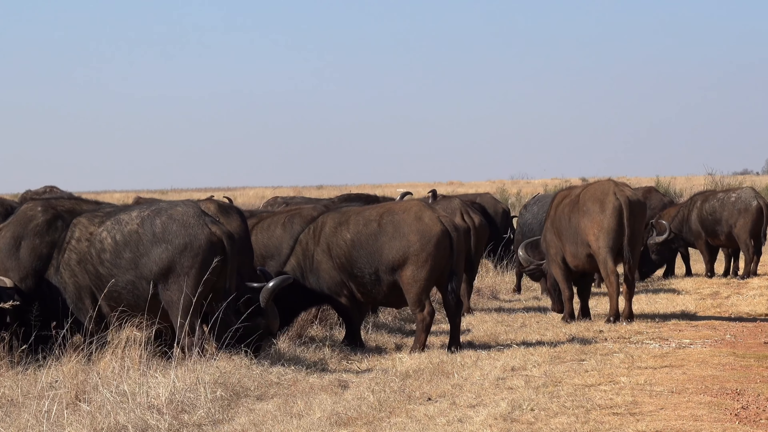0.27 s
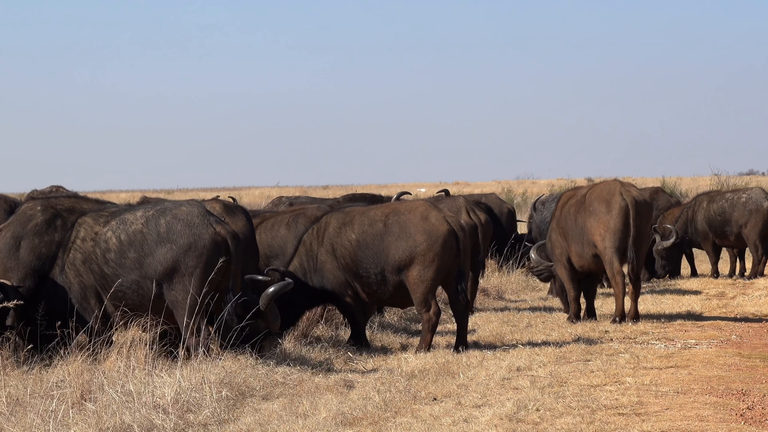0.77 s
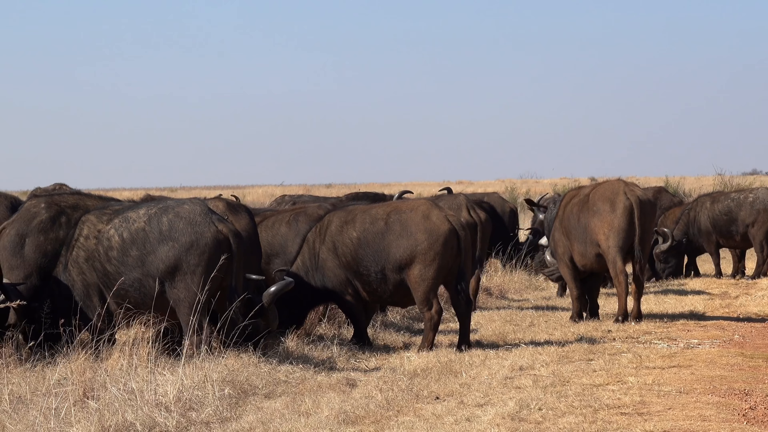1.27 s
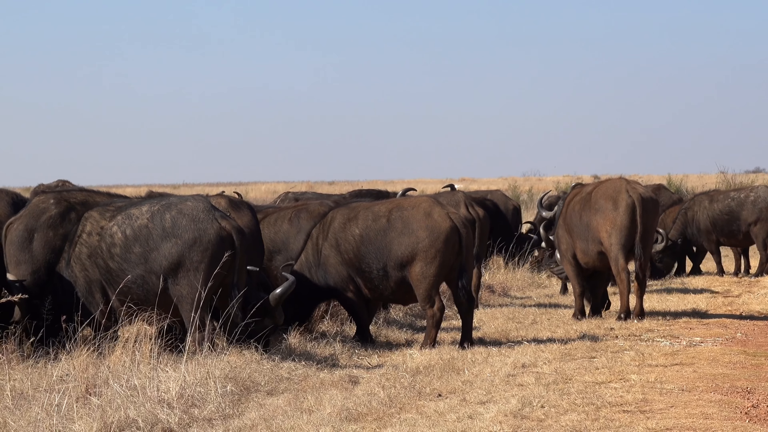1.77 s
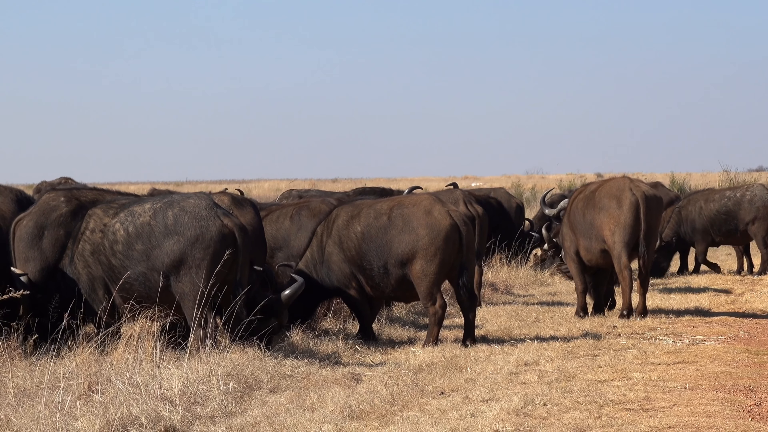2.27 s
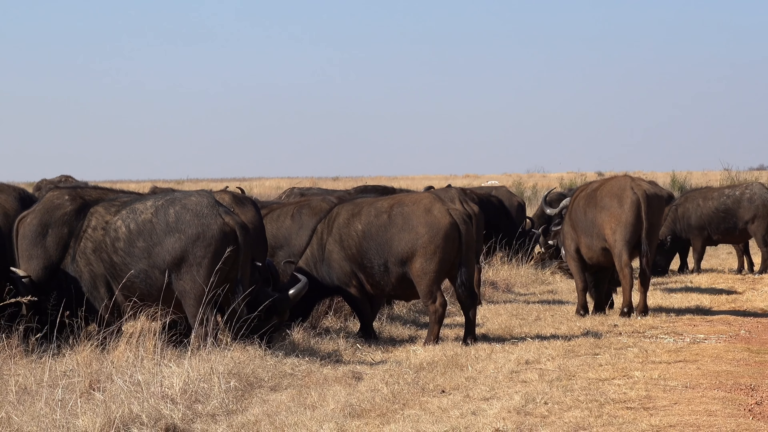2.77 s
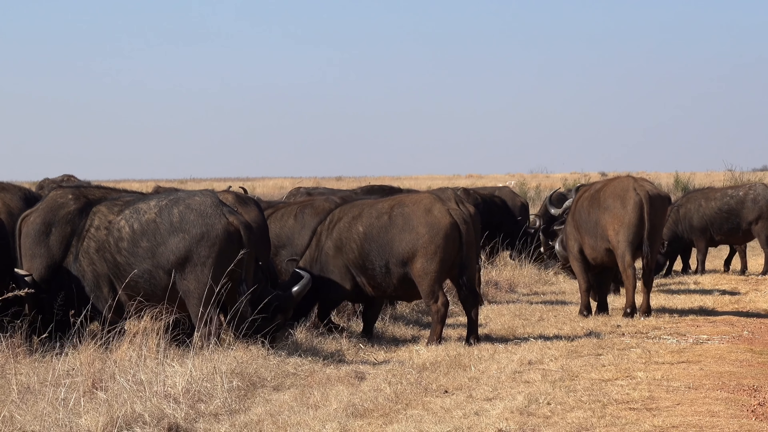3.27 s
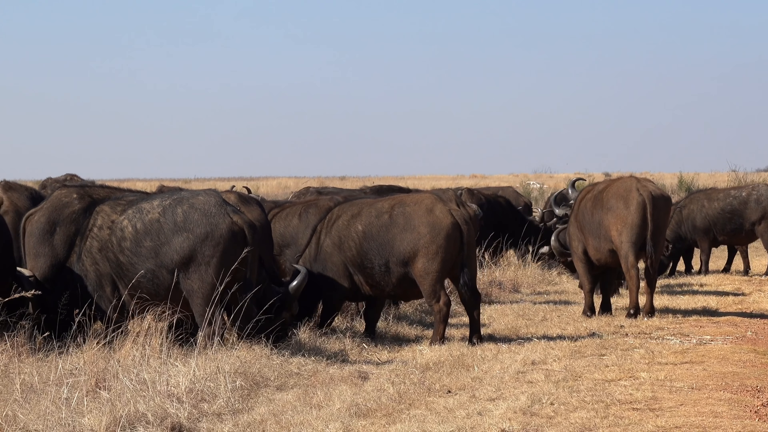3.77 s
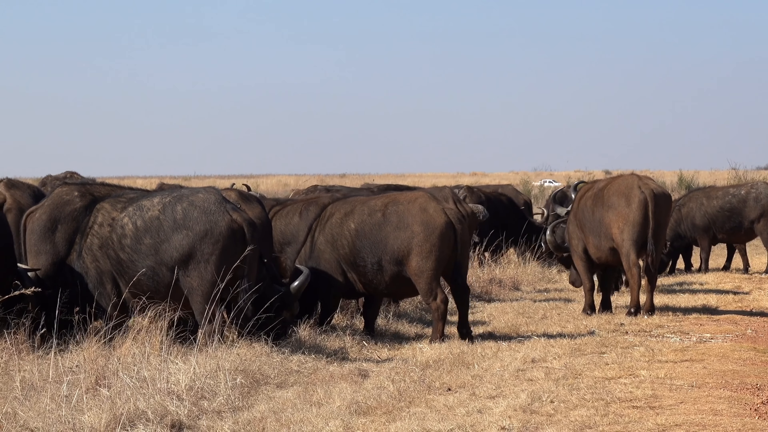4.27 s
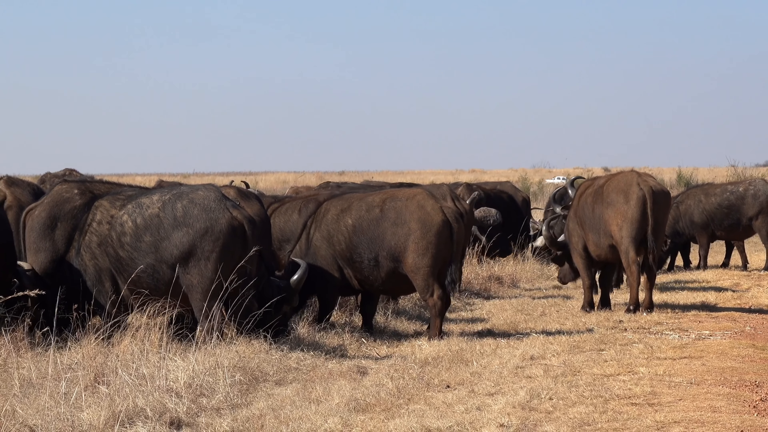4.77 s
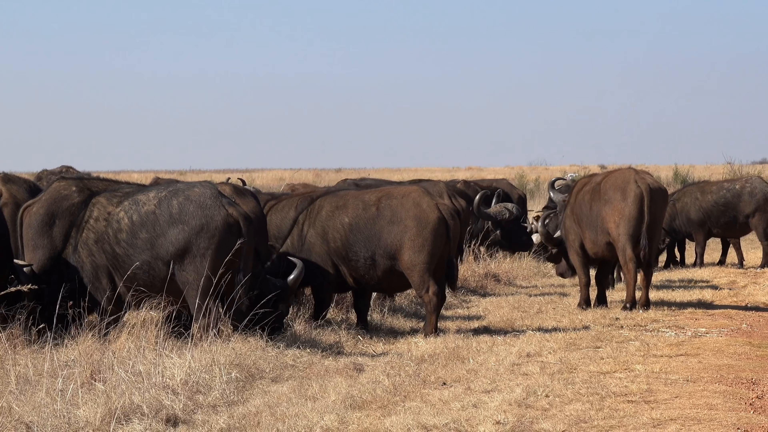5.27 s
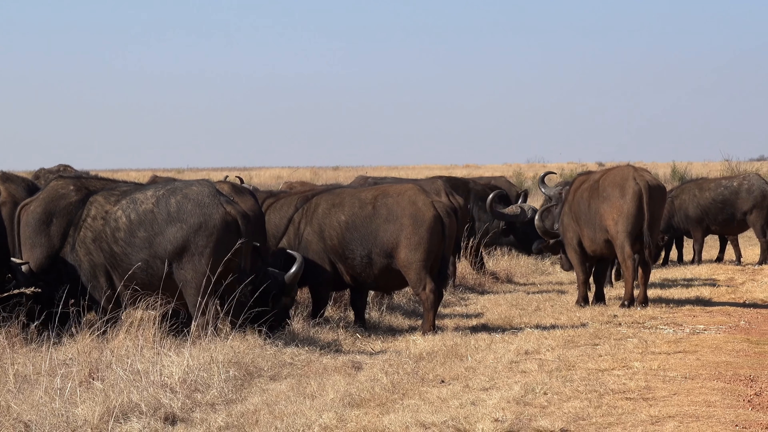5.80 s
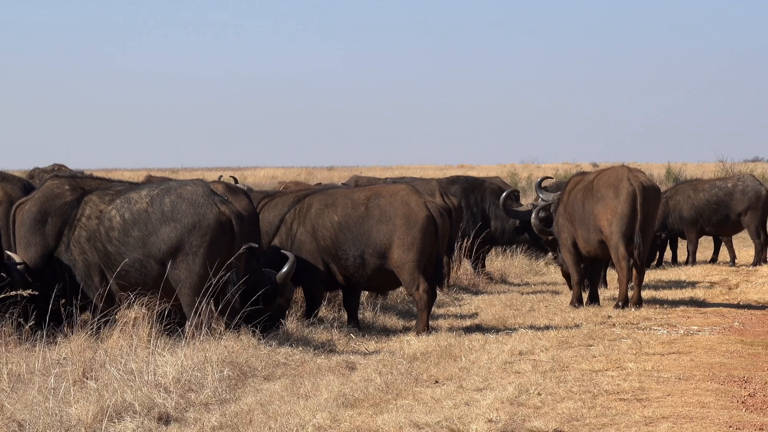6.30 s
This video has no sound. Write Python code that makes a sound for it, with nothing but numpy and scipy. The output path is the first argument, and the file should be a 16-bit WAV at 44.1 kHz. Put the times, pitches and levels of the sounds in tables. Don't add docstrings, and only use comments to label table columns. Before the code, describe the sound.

A buffalo close by finishes a call, gives a rattling grunt and a long distorted bellow, then grunts and bellows again more briefly.

```python
import sys
import numpy as np
from scipy import signal
from scipy.io import wavfile
from scipy.ndimage import uniform_filter1d

SR = 44100
rng = np.random.default_rng(int(sys.argv[2]) if len(sys.argv) > 2 else 0)


def boost_factor(decibels):
    exponent = np.asarray(decibels, float) / 20
    return 10 ** exponent


def waveform_to_disk(signal):
    frames = np.transpose(np.atleast_2d(signal))
    scaled = np.clip(frames, -1, 1) * 32767
    samples = np.round(scaled).astype(np.int16)
    wavfile.write(sys.argv[1], SR, samples)


N = 288414


def evened(x):
    return x / np.sqrt(np.mean(x ** 2) + 1e-20)


def steadied(x, seconds):
    width = int(seconds * SR)
    power = uniform_filter1d(uniform_filter1d(x ** 2, width), width)
    return x / np.sqrt(abs(power) + 1e-20)


def read(points, hz):
    f, value = np.transpose(points)
    return np.interp(np.log(hz + 1), np.log(f + 1), value)


def follow(table, t):
    when, *columns = np.transpose(table)
    return [np.interp(t, when, column) for column in columns]


def add(mix, s, sound):
    part = mix[round(s * SR):][:len(sound)]
    part += sound[:len(part)]


def resonate(x, hz, width_hz):
    turn = np.exp(2j * np.pi * np.cumsum(hz * np.ones(len(x))) / SR)
    r = np.exp(-np.pi * width_hz / SR)
    return 2 * (turn * signal.lfilter([1 - r], [1, -r], x / turn + 1e-18)).real


def ring(x, hz, width_hz, skirt_hz):
    return resonate(resonate(resonate(x, hz, width_hz), hz, skirt_hz), hz, skirt_hz)


# pitch_hz, level_db (per Hz)
AIR_COLOUR = [(15, -39.5), (25, -16), (110, -1.5), (210, -7.5), (400, -4), (520, -4.5), (750, -4),
              (1020, -4.5), (1520, -12), (2350, -17), (5000, -27.5), (9300, -34.5), (13000, -35),
              (16000, -50.5)]


def air():
    frames, hz = N // 256 + 5, np.fft.rfftfreq(1024, 1 / SR)
    a, b, patches = rng.standard_normal((frames, 513, 3)).T
    patches = evened(uniform_filter1d(uniform_filter1d(patches, 14, 0), 20, 1))
    swell = evened(uniform_filter1d(rng.standard_normal(frames), 30))
    z = (a + 1j * b) * boost_factor(read(AIR_COLOUR, hz)[:, None] + 1.5 * patches + 0.6 * swell)
    hiss = signal.istft(z, nperseg=1024, noverlap=768)[1][:N]
    insect_hz, insect_width_hz = 12900, 250
    insect = resonate(rng.standard_normal(N), insect_hz, insect_width_hz)
    insect = resonate(insect, insect_hz, insect_width_hz)
    return boost_factor(-70.5) * evened(hiss) + boost_factor(-96) * evened(insect)


# start_s, level_db,
# length_s, # centre_hz
RUSTLES = [(.5, -57.5, 0.23, 45), (0.71, -64.5, 0.12, 170), (2.081, -51.5, 0.59, 34.38),
           (2.484, -48.5, .45, 36.6), (2.997, -39, 0.067, 49), (3.102, -53.5, 0.13, 45),
           (6.0, -55, 0.45, 35.1), (1.0707, -71.5, 0.027, 3000), (3.455, -78, 0.6, 3100),
           (3.816, -53, 0.031, 705), (3.823, -62.5, 0.043, 240), (3.83, -66.5, 0.038, 3390),
           (3.912, -66.5, 0.03, 2490), (4.092, -67.5, 0.16, 4020), (4.194, -75.5, 0.23, 3070),
           (4.524, -76, 0.03, 3970), (4.552, -64.5, 0.00445, 2500), (4.559, -57, 0.0061, 1400),
           (4.5598, -72, 0.066, 886), (4.85, -71.5, 0.25, 71), (5.57, -41.5, 0.0079, 748),
           (6.493, -50.5, .07, 453), (3.18, -54, .1, 300), (0.62, -70.5, 0.029, 2100),
           (.451, -50, 0.0042, 4000)]


def rustling():
    out = np.zeros(N)
    for (s, db, length, hz), snaps in zip(RUSTLES, rng.standard_normal((len(RUSTLES), SR // 2))):
        spiky = snaps * abs(snaps)
        clump = evened(resonate(resonate(spiky, hz, 2.2 * hz), hz, 1.2 * hz))[:int(length * SR)]
        add(out, s, boost_factor(db) * clump * signal.windows.hann(len(clump)) ** 0.75)
    return out


# start_s, peak_db
KNOCKS = [
    (4.0943, -25),
    (4.0959, -25),
    (4.0986, -18.5),
    (4.0999, -31),
]
# pitch_hz, level_db, fade_s (time to fall 60 dB)
HORN_TONES = [(150, -14, .03), (330, -5, .02), (560, -4, .02), (770, -5, .012), (1300, 3, .012),
              (1540, -4, .01), (2200, -9, .008), (2950, -7, .008), (7300, -16, .004)]


def horns():
    out, t = np.zeros(N), np.arange(2000) / SR
    tones = -sum(boost_factor(db - 60 * t / fade) * np.cos(2 * np.pi * hz * t) for hz, db, fade in HORN_TONES)
    tones = np.convolve(tones, np.hanning(7))
    for s, db in KNOCKS:
        add(out, s, boost_factor(db) * tones / abs(tones).max())
    return out


# pitch_hz, fade_s (time to fall 60 dB)
ECHO_FADE = [(200, 0.093), (1500, 0.21), (5000, 0.057), (14000, 0.028)]


def scattered(x):
    taps = np.zeros(SR // 2)
    at = np.arange(400, SR // 2 - 20, 20)
    taps[at + rng.integers(0, 20, len(at))] = rng.choice([-1., 1.], len(at))
    hz, t, z = signal.stft(taps, SR, nperseg=256)
    fade = boost_factor(-60 * t / read(ECHO_FADE, hz)[:, None])
    tail = signal.istft(z * fade, SR, nperseg=256)[1]
    return signal.fftconvolve(x, tail / np.linalg.norm(tail))[:N]


# time_s, effort_db, fold_pulses_hz, chest_hz, mouth_opening_0to1
CALL_END = [
    ((.3, .62, .02, -3, -12), [(.259, -27, 94, 160, .2), (.28, -28.5, 92, 158, .3), (.34, -29, 86, 170, .35), (.42, -24, 79, 166, .45), (.465, -23, 74, 179, .3)]),
    ((.5, .75, .2, 6, -10), [(.5, -32, 68, 168, .35), (.57, -45, 55, 143, .5), (.592, -43, 52, 140, .75), (.63, -55, 48, 135, .3), (.665, -52, 47, 128, .3), (.74, -71, 49, 126, .5)]),
]
FIRST_GRUNT = [
    ((.06, .05, -3.5, -11, -5), [(1.0, -70.5, 54, 104, 0.18), (1.05, -69, 55.4, 108, 0.19), (1.14, -56, 58.8, 115, 0.16), (1.24, -67.5, 65, 116, .05)]),
    ((.03, 0.26, -10, -1, -4), [(1.271, -51, 32, 154, .25), (1.35, -45.5, 32, 163, .4), (1.4, -45.5, 31.8, 164, .4), (1.462, -46, 27, 165, .4), (1.54, -46, 24, 164, .4), (1.63, -50, 19, 148, .15), (1.7, -59, 16, 122, .2)]),
    ((1.1, 1.3, 1.3, 1.4, -3), [(1.746, -61.5, 45, 107.8, 0.5), (1.786, -54, 49, 95, 0.38), (1.83, -69, 60, 150.2, 0.44)]),
]
FIRST_BELLOW = [
    ((.1, .52, 3.5, -4, 0), [(1.865, -42.5, 60.5, 161, 0.72), (1.89, -34, 67.3, 156.4, 0.55), (1.95, -27.5, 66.2, 167.6, 0.81), (2.03, -28, 63.4, 185, 0.88), (2.09, -27, 67, 202.2, 0.99)]),
    ((0.4, 0.59, -0.042, 0.37, -1.8), [(2.11, -22.5, 89.65, 233, 0.88), (2.22, -24.5, 96, 222.5, 0.93), (2.4, -22, 95, 223, 0.77), (2.54, -24.5, 83.8, 180, 0.84), (2.66, -24.5, 79.4, 199.6, 0.82), (2.82, -22.5, 75.5, 185.4, 0.79)]),
    ((0.05, 0.54, 0.9, 4, -2), [(2.86, -29, 69, 155, 0.83), (2.93, -26.5, 60.6, 125, 0.58), (2.97, -40, 59.7, 111, 0.6)]),
    ((0.41, 1.2, 0.8, 11, -10), [(3.0, -49.5, 68.3, 98.4, 0.83), (3.045, -42.5, 45.96, 86.4, 0.045), (3.09, -52.5, 46.2, 97.5, 0.99), (3.14, -50, 46, 136, 0.61), (3.25, -73.5, 44.3, 122, 0.53)]),
]
SECOND_GRUNT = [
    ((0.26, 0.83, -0.2, 8.5, -1), [(5.075, -67.5, 34.57, 151.5, 0.061), (5.095, -48.5, 33.58, 161, 0.14), (5.15, -52, 33.14, 163, 0.7), (5.3, -47, 33.9, 170, 0.57), (5.46, -47, 33.1, 179, 0.71), (5.51, -46.5, 31.14, 186, 0.6)]),
    ((0.036, 0.84, .95, 7.5, 1.1), [(5.543, -45, 19.63, 182, 0.48), (5.59, -47.5, 26.5, 167, 0.73), (5.63, -53, 24.56, 164, 0.78), (5.71, -51, 24.53, 163, 0.71), (5.77, -50.5, 23.2, 193, 0.81)]),
]
SECOND_BELLOW = [
    ((0.2, 0.5, 0, -5, 1), [(5.785, -33, 70.4, 194, 0.087), (5.81, -33.5, 88.8, 207, 0.49), (5.83, -30, 130.3, 192, 0.82), (5.88, -31, 135.7, 170, 0.82)]),
    ((.08, .62, 4.5, 0, 5), [(5.89, -30, 67.5, 157.4, 0.93), (5.985, -25.5, 69.35, 191.5, 0.94), (5.997, -24.5, 130.8, 204.2, 0.83), (6.015, -25, 130.1, 215.6, 1)]),
    ((.07, .22, .4, 5, 7), [(6.03, -21, 96.4, 223.2, 0.82), (6.09, -24, 94.8, 207.8, 0.78), (6.19, -24.5, 88.7, 188.3, 0.84), (6.25, -24.5, 85.3, 186.7, 0.72), (6.326, -25.5, 80.6, 168.3, 0.78), (6.342, -22, 74.1, 141.5, 0.14), (6.39, -37.5, 71.7, 134.4, 0.39), (6.41, -34.5, 62.9, 123, 0.067)]),
    ((.6, 1, -3, 10, -6), [(6.44, -47, 58.1, 124, .1), (6.48, -50.5, 55, 140, 0.7), (6.54, -52.5, 54.4, 180, 0.35)]),
]
BREATHS = [CALL_END, FIRST_GRUNT + FIRST_BELLOW, SECOND_GRUNT + SECOND_BELLOW]
# shut_db, open_db (of the mouth)
SECOND_DB, THIRD_DB, UPPER_DB = (-22, -0.5), (-21.5, 4.5), (-33.5, -19.5)
# shut_hz, open_hz
SECOND_HZ, THIRD_HZ = (570, 605.6), (1037, 1028.3)


def controls(t):
    blend_s = 0.019
    spent_db = 23
    phrases = sum(BREATHS, [])
    effort_db, rate, chest_hz, mouth = follow([row for _, rows in phrases for row in rows], t)
    starts = [rows[0][0] for _, rows in phrases]
    which = np.maximum(np.searchsorted(starts, t + blend_s / 2) - 1, 0)
    kinds = np.array([(*kind, max(row[1] for row in rows)) for kind, rows in phrases])
    blended = uniform_filter1d(kinds[which], int(blend_s * SR), axis=0).T
    uneven, breath, damping, rasp_db, fifth_db, peak_db = blended
    spent = np.clip((peak_db - effort_db) / spent_db, 0, 1) ** 2
    shares = (uneven, spent * (rate > 34)), (breath, spent), (damping, spent)
    uneven, breath, damping = (np.clip(v + (1 - v) * fade, 0, 1) for v, fade in shares)
    lift = 0.25 * (chest_hz - 180)
    second_db, third_db, upper_db, second_hz, third_hz = (
        shut + (wide - shut) * mouth for shut, wide in (SECOND_DB, THIRD_DB, UPPER_DB, SECOND_HZ, THIRD_HZ))
    return (rate, uneven, breath, damping), (effort_db, second_db, third_db, upper_db + rasp_db, fifth_db,
                                             chest_hz, second_hz + lift, third_hz + lift)


# start_s, strength_db (over a plain
SLAPS = [(.28, 5), (.302, 4), (.326, 8), (.352, 6), (.378, 5.5), (.401, 4), (.423, 15.5), (.452, 19.5),
         (.475, 5), (.492, 0), (.509, 6.5), (.529, 0.5), (.585, 1.5), (1.786, 26), (1.905, -1),
         (1.929, 2.5), (1.951, 2.5), (1.969, 5.5), (1.99, 0), (2.019, -0.5), (2.063, 6), (2.093, 5.5),
         (2.108, 5.5), (2.125, 11), (2.153, 13), (2.179, 11), (2.196, 6), (2.226, 10), (2.265, 12),
         (2.293, 11), (2.324, 9), (2.361, 2), (2.371, -1), (2.39, 9), (2.423, 14.5), (2.457, 14),
         (2.505, 6), (2.53, 9.5), (2.553, 9), (2.578, 6.5), (2.603, 12.5), (2.627, 10), (2.641, 8.5),
         (2.677, 0), (2.722, 8.5), (2.747, 6), (2.77, 11.5), (2.823, 10.5), (2.853, 9), (2.891, 5.5),
         (2.917, 3), (5.849, 10), (5.886, -0.5), (5.921, 1), (6.024, 9.5), (6.054, 11), (6.104, 5),
         (6.127, 4.5), (6.159, 5.5), (6.275, 2),
         (0.657, 8), (1.875, 5.5), (2.033, 0.5), (2.049, 1.5), (2.078, 4), (2.169, 8), (2.206, 7.5),
         (2.218, -5), (2.136, 8.5), (2.145, -5.5), (2.276, 8), (2.302, 8), (2.313, -5), (2.237, 7),
         (2.335, 6), (2.346, -2.5), (2.401, 7), (2.493, 1), (2.566, 7.5), (2.701, 2.5), (2.786, 8),
         (2.8, -2), (2.932, 4), (5.832, 3), (5.948, -2), (5.977, -1.5), (5.995, 4), (6.035, 5.5),
         (6.046, -2), (6.095, 4), (6.114, -1.5), (6.137, 0.5), (6.148, 1.5), (6.181, 4.5), (6.204, -0.5),
         (6.227, 5), (6.25, 1.5), (6.298, 4), (6.324, -3), (6.409, 4)]
RESTARTS_S = [
    .259,
    1.0,
    1.271,
    1.746,
    1.865,
    3.034,
    5.089,
    5.543,
    5.797,
]


def folds(hz, uneven):
    slaps = sorted(SLAPS + [(s, 0) for s in RESTARTS_S])
    pulses, ends = np.zeros(N), [row[0] for row in slaps[1:]] + [N / SR]
    for (now, over_db), end, chance in zip(slaps, ends, rng.standard_normal((len(slaps), 200, 2))):
        cycles = hz[int(now * SR):int(end * SR)].sum() / SR
        fit = cycles / max(round(cycles - .1), 1) if end - now < .12 else 1
        chance = chance * (np.arange(200) > 0)[:, None]
        for late, strong in chance:
            period, rough = fit / hz[int(now * SR)], uneven[int(now * SR)]
            pulses[round(now * SR) - 1] = boost_factor(over_db + 8.0 * rough * strong)
            over_db *= .55
            now += period * np.clip(1 + .3 * rough * late, .5, 2)
            if now > end - .6 * period:
                break
    return pulses


# time_s, level_db, start_hz, rise_hz_per_s
WHOOSH = [(1.27, -73, 940, 9000), (1.33, -52, 1000, 7040), (1.46, -58.5, 940, 7000), (1.55, -55, 930, 6000),
          (1.631, -69.5, 960, 6000), (5.085, -77, 980, 30000), (5.099, -57.5, 990, 30200),
          (5.14, -51.5, 1000, 34600), (5.25, -49, 1000, 35300), (5.321, -53, 840, 19800),
          (5.449, -46, 840, 19900), (5.52, -51, 860, 15100), (5.56, -61, 900, 8950),
          (5.768, -64, 915, 9000)]


def gap_whoosh(t, since, white):
    gap_db, gap_hz, rise = follow(WHOOSH, t)
    late = since / 0.0074
    rush = steadied(ring(white, gap_hz + rise * np.minimum(since, .022), 200, 600), 0.062)
    return boost_factor(gap_db) * rush * late * np.exp(1 - late)


def leaking_air(pulses, slack, breath, white):
    gusts = .5 + 1.5 * slack + evened(signal.lfilter([1], [1, -.994], pulses))
    leak = steadied(gusts * rng.standard_normal(N), 0.031)
    sighing = uniform_filter1d(np.clip((breath - .82) / .15, 0, 1), 400)
    return np.sqrt(abs(1 - sighing)) * leak + np.sqrt(abs(sighing)) * white


WIDTHS_HZ = [30, 108, 54, 163, 170]


def chest_sound(low, chest_hz, damping, slack):
    ringing, damped = (steadied(ring(low, chest_hz, w, 160), 0.23) for w in WIDTHS_HZ[:2])
    body = steadied(ring(low, 140.6, 88, 80), 0.075)
    return (1 - damping) * ringing + damping * damped + 0.36 * (1 - slack) * body


# time_s, second_factor, third_twin_factor
TONGUE = [(.26, 1.13, 0.76), (0.701, 1.03, 0.99), (1.002, 1.1, 0.86), (1.8, 0.85, 1), (1.949, 0.98, 0.95),
          (2.08, 0.95, 0.86), (2.199, 0.91, 0.99), (2.381, 0.91, 0.92), (2.55, 0.89, 0.93),
          (2.821, 0.83, 0.89), (2.89, 1.055, 0.84), (2.97, 1.03, .89), (3.1, 1.07, 0.907),
          (5.1, 0.99, 0.92), (5.3, 0.963, 0.81), (5.75, 0.91, 0.98), (5.9, 0.92, 0.91), (6.021, 0.89, 1),
          (6.12, 0.85, 0.99), (6.25, 1.01, 1), (6.36, 1.02, 0.88)]


def throat_sounds(drive, t, second_hz, third_hz, breath, slack):
    on_second, on_twin = follow(TONGUE, t)
    second = ring(drive, on_second * second_hz, WIDTHS_HZ[2], 440)
    second -= (0.22 - 0.11 * slack) * ring(drive, on_second * 400, 85, 270)
    second += 1.1 * (1 - slack) * breath ** 2 * ring(drive, 316, 310, 570)
    third = ring(drive, 0.9336 * third_hz, WIDTHS_HZ[3], 760)
    third -= 0.72 * ring(drive, on_twin * 1.159 * third_hz, 50, 1000)
    return second, third


# time_s, pitch_hz, level_db (over the third)
NOSE = [(.26, 1430, -9.5), (.7, 1380, -12.5), (1.3, 1500, -13.5), (1.799, 1460, -13), (1.95, 1380, -19),
        (2.2, 1443, -15.5), (2.45, 1500, -19), (2.7, 1460, -23), (2.969, 1340, -13), (3.1, 1330, -9.5),
        (5.1, 1475, -8.5), (5.5, 1520, -7.5), (5.85, 1420, -17.5), (6.03, 1450, -13.5), (6.2, 1396, -7.5),
        (6.34, 1330, -11.5), (6.5, 1370, -10)]


def nose_sound(drive, t):
    nose_hz, nose_db = follow(NOSE, t)
    return ring(drive, nose_hz, 130, 890), nose_db


# time_s, fourth_hz, fifth_hz, sixth_hz, seventh_hz, eighth_hz
PALATE = [(.3, 1720, 2150, 3400, 4500, 5250), (.5, 1700, 2200, 3400, 4000, 5300),
          (.62, 1660, 2100, 3000, 4000, 4650), (1.3, 1750, 2200, 3550, 3900, 4900),
          (1.6, 1700, 2600, 3000, 3900, 4900), (1.9, 1960, 2760, 3250, 4650, 5100),
          (2.02, 1900, 2860, 3850, 5000, 5800), (2.13, 1850, 2400, 3000, 4160, 5120),
          (2.28, 1950, 2300, 3000, 3980, 5100), (2.42, 1900, 2350, 3100, 4200, 5250),
          (2.58, 1750, 2350, 2990, 4180, 5300), (2.72, 1940, 2350, 2950, 4130, 4900),
          (2.9, 2020, 2450, 2900, 4110, 5800), (3.01, 1830, 2350, 3140, 4540, 5040),
          (3.12, 1810, 2300, 2890, 4160, 4690), (5.1, 1650, 1950, 2930, 3750, 4950),
          (5.25, 1800, 2350, 3340, 4000, 4800), (5.4, 1900, 2450, 3340, 3770, 4690),
          (5.65, 1850, 2250, 3000, 3900, 4760), (5.87, 1950, 2450, 3450, 4600, 5900),
          (5.96, 1950, 2430, 3420, 4160, 5190), (6.13, 1950, 2400, 3320, 4000, 4930),
          (6.27, 1950, 2410, 3550, 4200, 5300), (6.39, 1770, 2300, 2910, 4000, 4890),
          (6.5, 1870, 2400, 3490, 4000, 4760)]
# width_hz, level_db (over the fourth)
UPPER = [(520, -14.5), (650, -18.5), (700, -23)]


def palate_sound(high, airy, soft, t, since, fifth_db, breath, slack):
    fourth_hz, fifth_hz, *top_hz = follow(PALATE, t)
    upper = boost_factor(fifth_db) * ring(high, fifth_hz, 160, 1200) - ring(high, fourth_hz, WIDTHS_HZ[4], 1200)
    for hz, (width_hz, db) in zip(top_hz, UPPER):
        upper += boost_factor(db) * ring(airy + .4 * soft, hz, width_hz, 1300)
    upper += boost_factor(-31) * ring(airy, 6200, 3000, 4200)
    upper += 0.23 * slack * breath * ring(airy, 3750, 2700, 3400)
    dryness = np.clip(1.3 * slack * (1 - breath), 0, .9)
    return upper * (1 - dryness * (1 - np.exp(-since / .012)))


def loudness_punch(pulses, last_pulse):
    latest_db = 20 * np.log10(pulses[last_pulse] + 1e-3)
    extra_db = uniform_filter1d(latest_db, 60) - uniform_filter1d(latest_db, 2600)
    return boost_factor(np.clip(0.15 * extra_db, -9, 9))


def voice():
    times, out = np.arange(N) / SR, np.zeros(N)
    (rate, uneven, *shares), throat = controls(times)
    pulses = folds(rate, uneven)
    slackness = np.clip((44 - rate) / 10, 0, 1)
    last_pulse = np.maximum.accumulate(np.arange(N) * (pulses > 0))
    gap_s = times - np.maximum.accumulate(times * (pulses > 0))
    blunt = steadied(signal.oaconvolve(pulses, signal.windows.hann(13))[:N], 0.66)
    white = rng.standard_normal(N)
    whoosh = gap_whoosh(times, gap_s, white)
    leaking = leaking_air(pulses, slackness, shares[0], white)
    smooth = steadied(0.2 * leaking + white, 0.075)
    punch = loudness_punch(pulses, last_pulse)
    everything = (times, gap_s, slackness, *shares, blunt, leaking, smooth, *throat)
    for phrases in BREATHS:
        start, end = phrases[0][1][0][0] - .007, phrases[-1][1][-1][0]
        at = slice(round(start * SR), round(end * SR))
        (t, since, slack, breath, damping, soft, leak, airy, effort_db, second_db, third_db, upper_db,
         fifth_db, chest_hz, second_hz, third_hz) = (c[at] for c in everything)
        low_share = breath ** 2 * (1 - .75 * slack)
        high_share = np.maximum(.3 + .7 * breath, .9 * slack)
        drive, low, high = (np.sqrt(1 - share) * soft + np.sqrt(share) * leak
                            for share in (breath, low_share, high_share))
        chest = chest_sound(low, chest_hz, damping, slack)
        puff = ring(drive, 92, 63, 89)
        puff_db = -28 + 8 * breath + (16 - 9 * damping) * slack
        second, third = throat_sounds(drive, t, second_hz, third_hz, breath, slack)
        upper = palate_sound(high, airy, soft, t, since, fifth_db, breath, slack)
        nose, nose_db = nose_sound(drive, t)
        parts = [(-chest, 0), (-puff, puff_db), (-second, second_db - 4 * slack),
                 (third, third_db - 3 * slack), (-upper, upper_db), (nose, third_db + nose_db)]
        call = sum(boost_factor(db) * steadied(part, 0.033) for part, db in parts)
        call *= 1 - 0.6 * slack * (1 - 2 * np.exp(-(since / .014) ** 2))
        closing = np.clip((end - t) / 0.0016, 0, 1)
        out[at] = (boost_factor(effort_db) * punch[at] * call + slack * whoosh[at]) * closing
    return out


def scene():
    near, far = voice(), horns() + rustling()
    echoes = scattered(boost_factor(-21) * near + boost_factor(-19.5) * far)
    return (near + far + echoes + air())[None]


def low_pass(x):
    return signal.sosfilt(signal.butter(12, 16000, fs=SR, output="sos"), x)


def record(dry):
    start_s, overload = .2545, .222
    after = np.arange(N) / SR - start_s
    live = (dry + .06 * np.exp(-abs(after) / .0012)) * (after >= 0)
    clipped = np.clip(live, -overload, overload)
    coupled = signal.lfilter(*signal.butter(1, 25, "high", fs=SR), clipped)
    return low_pass(coupled)


dry = scene()
out = record(dry)
waveform_to_disk(out)
```